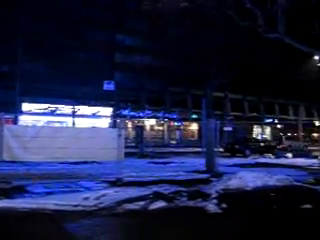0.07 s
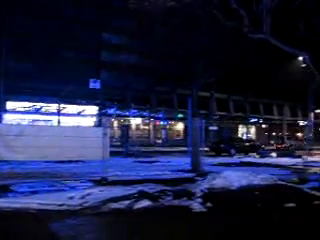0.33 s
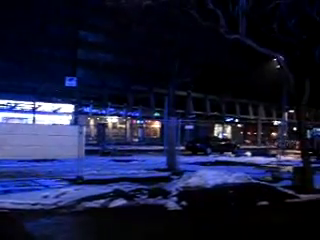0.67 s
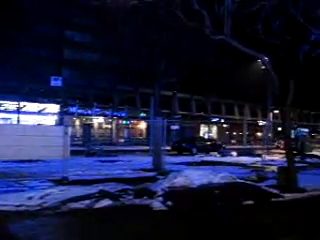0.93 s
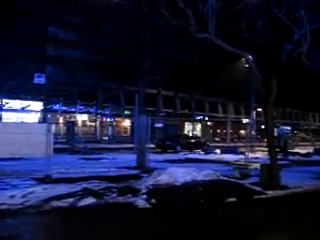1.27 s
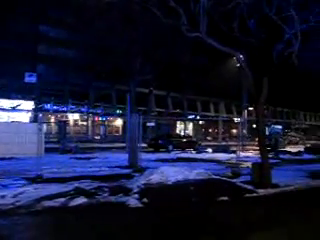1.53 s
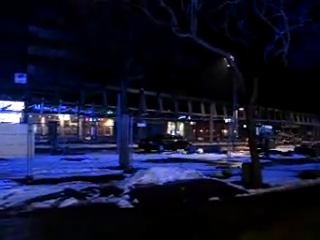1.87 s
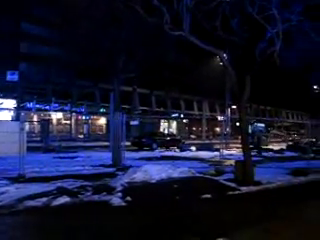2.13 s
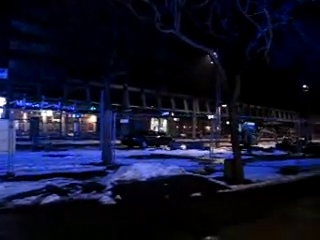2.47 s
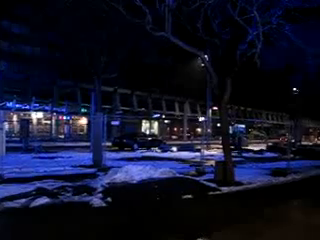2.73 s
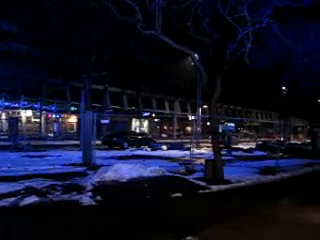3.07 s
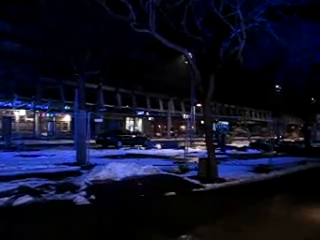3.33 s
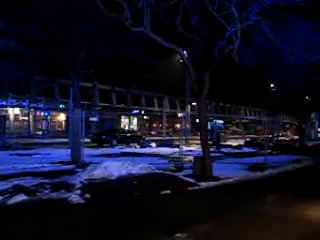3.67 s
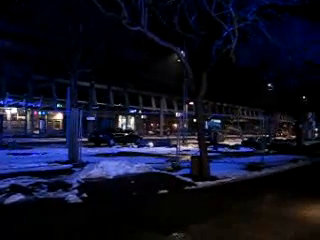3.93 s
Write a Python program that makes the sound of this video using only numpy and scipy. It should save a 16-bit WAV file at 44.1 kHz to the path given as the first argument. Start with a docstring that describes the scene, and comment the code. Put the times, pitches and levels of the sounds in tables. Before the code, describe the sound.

A heavy vehicle pulls slowly away along a wet city street, its engine humming and tyres hissing. It fades after about two seconds into steady distant traffic, with a second engine droning farther off and a few faint ticks nearby.

```python
"""A heavy vehicle draws slowly away down a wet city street at night. Its engine hums, its
exhaust booms and its body throbs, while its rumble, tyre roar and spray sink into the steady
wash of distant traffic. Farther off, a second engine drones and tyre treads whine.
A few faint, dry ticks sound close by."""
import sys
import numpy as np
from scipy import signal
from scipy.fft import rfft, irfft
from scipy.io import wavfile
from scipy.ndimage import uniform_filter1d, minimum_filter1d

SR = 44100
rng = np.random.default_rng(int(sys.argv[2]) if len(sys.argv) > 2 else 0)


def store_pcm(level_fs):
    """Save levels as 16-bit WAV."""
    pcm = np.round(np.clip(level_fs, -1, 1) * 32767).astype(np.int16)
    wavfile.write(sys.argv[1], SR, np.atleast_2d(pcm).T)


N = 176400


def from_db(db):
    """Decibels to gain."""
    return 10 ** (np.asarray(db) / 20)


def in_time(rows):
    """Draw a curve through timed rows: each column after the seconds, at every sample."""
    seconds, *columns = np.transpose(rows)
    return [np.interp(np.arange(N) / SR, seconds, column) for column in columns]


def noise(gain_at):
    """Noise of unit rms, shaped by a function from frequency to gain."""
    hz = np.maximum(np.arange(N // 2 + 1) * SR / N, 1e-3)
    return unit_rms(irfft(rfft(rng.standard_normal(N)) * gain_at(hz), N))


def unit_rms(x):
    """Scale to unit rms."""
    return x / np.sqrt(np.mean(x ** 2) + 1e-20)


def coloured(spectrum):
    """Noise of unit rms, its colour drawn through points of Hz and relative dB."""
    points_hz, db = np.transpose(spectrum)
    return noise(lambda hz: from_db(np.interp(np.log(hz), np.log(points_hz), db)))


def drift(rate_hz):
    """A slow random wander with a spread of 1."""
    return noise(lambda hz: 1 / (1 + (hz / rate_hz) ** 2))


def steady(x, window_s):
    """Even out the swells of a noise that last longer than the window; unit rms."""
    size = max(int(window_s * SR), 2)
    power = uniform_filter1d(uniform_filter1d(x ** 2, size), size)
    return unit_rms(x / np.sqrt(np.abs(power) + 1e-9))


def ring(clicks, hz, t60):
    """Each click sets a sine ringing that dies by 60 dB in t60 seconds."""
    decay = from_db(-60 / (t60 * SR))
    angle = 2 * np.pi * hz / SR
    return signal.lfilter([0, np.sin(angle)], [1, -2 * decay * np.cos(angle), decay ** 2], clicks + 1e-18)


def firing_note(curve, waver_hz, flutter_db=1.5):
    """An engine's firing rate as a sine that wavers in pitch and level."""
    hz, db = in_time(curve)
    phase = 2 * np.pi * np.cumsum(hz + waver_hz * drift(rate_hz=5.5)) / SR
    return np.sqrt(2) * np.sin(phase) * from_db(db + flutter_db * drift(rate_hz=6))


def distant_traffic(level_db=-23.5):
    """Many far vehicles merge into one even wash."""
    # The colour of the wash. Each row: frequency in Hz, relative level in dB.
    spectrum = [(12, -20.5), (25, -13), (45, -2), (85, 1.5), (125, -3), (195, -5.5), (240, -10),
                (340, -10.5), (400, -13), (500, -11.5), (600, -13), (790, -10.5), (920, -10.5), (1080, -10),
                (1180, -16.5), (1450, -20.5), (1750, -21.5), (1980, -20), (2230, -22), (2500, -26),
                (3400, -28), (3900, -33.5), (4900, -39), (6000, -46.5), (6900, -67.5)]
    return from_db(level_db) * steady(coloured(spectrum), window_s=0.11)


def far_whine(centre_hz=972, half_width_hz=92):
    """The treads of fast tyres on a far road sing in one resonance."""
    # The swell of the whine. Each row: time in seconds, level in dB.
    swell = [(0, -45), (.9, -39), (1.9, -37.5), (2.3, -41.5), (3, -38.5), (3.4, -38.5), (4, -32)]
    whine = noise(lambda hz: 1 / (1 + ((hz - centre_hz) / half_width_hz) ** 4))
    return from_db(in_time(swell)[0]) * steady(whine, window_s=0.092)


def far_engine():
    """A second engine drones farther off, its firing note climbing a little."""
    # The drone. Each row: time in seconds, pitch in Hz, level in dB.
    drone = [(0, 172, -47), (1.8, 174, -39.5), (2.2, 177, -33.5), (2.65, 175, -33.5), (2.9, 188, -40.5),
             (3.25, 197, -37.5), (4, 196, -49.5)]
    return firing_note(drone, waver_hz=3.0)


def dry_ticks():
    """Single clicks ring small, heavily damped bodies."""
    # The ticks. Each row: start in seconds, strike level in dB, pitch in Hz.
    strikes = [(1.1154, -26, 4800), (2.099, -19, 3600), (2.6094, -26, 3600), (2.6238, -22, 3200),
               (2.9194, -23, 4100), (3.6015, -21, 3900), (3.6163, -28, 4800)]
    # A body's modes. Each row: ratio to the pitch, gain in dB, seconds to die by 60 dB.
    modes = [(.74, -10.5, .002), (1, 5, 0.0021), (1.3, -6.5, 0.0022)]
    out = np.zeros(N)
    for start_s, strike_db, hz in strikes:
        click = from_db(strike_db) * (np.arange(N) == int(start_s * SR))
        for k, (ratio, mode_db, t60) in enumerate(modes):
            out += (-1) ** k * from_db(mode_db) * ring(click, hz * ratio, t60)  # alternating polarity
    return out


def vehicle_rolling():
    """The departing vehicle's body throbs and rumbles; its tyres roar and hiss on the wet road."""
    # The colour of each layer. Each row: frequency in Hz, relative level in dB.
    throb = [(15, -27.5), (30, -2.5), (42, 8), (53, 8.5), (66, 6.5), (85, -13), (140, -41)]
    rumble = [(12, -28), (28, -12), (48, -4.5), (72, 1), (105, -1.5), (170, -5.5), (250, -6.5),
              (300, -14.5), (420, -17), (900, -57)]
    tyres = [(150, -19.5), (330, 1), (410, -4), (480, 5.5), (680, 6.5), (900, -1.5), (1060, -6),
             (1300, -7.5), (1700, -13.5), (3000, -58)]
    spray = [(900, -27), (1600, -3.5), (2300, 0.5), (3200, -1.5), (4000, -7.5), (5000, -9.5), (6000, -21.5),
             (6900, -38)]
    # How each layer swells and recedes. Each row: time in seconds, level in dB.
    throb_fade = [(0, -28), (.5, -36.5), (.85, -33.5), (1.3, -32.5), (1.6, -35.5), (1.95, -34), (2.25, -38),
                  (2.8, -39), (3.35, -34), (4, -42)]
    rumble_fade = [(0, -25.5), (0.501, -24), (.9, -26.5), (1.4, -26.5), (1.9, -26.5), (2.4, -29.5),
                   (2.8, -40), (4, -43)]
    tyres_fade = [(0, -30.5), (.5, -27.5), (1, -29.5), (1.5, -28), (1.9, -28.5), (2.3, -35), (2.8, -42),
                  (4, -45.5)]
    spray_fade = [(0, -35), (.35, -38.5), (.7, -43.5), (1, -45), (1.35, -42), (1.8, -40.5), (2.3, -47),
                  (4, -57.5)]
    layers = [(throb, throb_fade), (rumble, rumble_fade), (tyres, tyres_fade), (spray, spray_fade)]
    out = np.zeros(N)
    for spectrum, fade in layers:
        out += from_db(in_time(fade)[0]) * steady(coloured(spectrum), window_s=0.038)
    return out


def vehicle_exhaust(centre_hz=235, half_width_hz=17):
    """Rough exhaust flow booms in one narrow resonance."""
    # The surges under load. Each row: time in seconds, level in dB.
    surges = [(0, -27.5), (.15, -26.5), (.28, -46), (.42, -25.5), (.56, -25.5), (.75, -42.5), (1.45, -27.5),
              (1.8, -46), (4, -57.5)]
    boom = noise(lambda hz: 1 / (1 + ((hz - centre_hz) / half_width_hz) ** 2))
    return from_db(in_time(surges)[0]) * steady(boom, window_s=0.1)


def vehicle_engine():
    """The heavy engine's firing makes a low hum that swells and dips."""
    # The hum. Each row: time in seconds, pitch in Hz, level in dB.
    hum = [(0, 80.5, -30.5), (.25, 78, -23), (.5, 76.83, -33.5), (.9, 76.9, -25), (1.15, 75.3, -30),
           (1.35, 69.8, -40), (1.7, 72, -34.5), (2.05, 75.5, -29), (2.4, 77.3, -26), (2.7, 79.9, -33.5),
           (3.05, 82.1, -28.5), (3.25, 80, -43), (3.5, 78, -29), (4, 77, -36)]
    return firing_note(hum, waver_hz=1.174)


def scene():
    """The heavy vehicle against the city, with ticks close by, in mono."""
    vehicle = vehicle_engine() + vehicle_exhaust() + vehicle_rolling()
    city = far_engine() + distant_traffic() + far_whine()
    return (vehicle + city + dry_ticks())[None]


def record(dry):
    """A limiter holds the peaks down; the treble rolls off and is then cut steeply."""
    ceiling, window = 0.39, int(0.008 * SR)
    rolloff_hz, cutoff_hz = 6320, 7500
    allowed_gain = ceiling / np.maximum(np.abs(dry), ceiling)
    limited = dry * uniform_filter1d(minimum_filter1d(allowed_gain, window), window)
    dull = signal.sosfilt(signal.butter(8, rolloff_hz, fs=SR, output="sos"), limited)
    return signal.sosfilt(signal.cheby2(16, 60, cutoff_hz, fs=SR, output="sos"), dull)


dry = scene()
out = record(dry)
store_pcm(out)
```